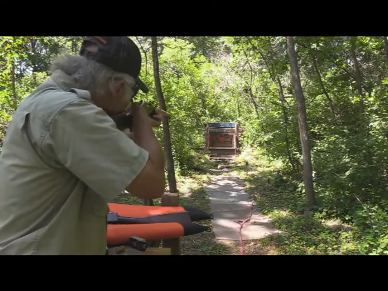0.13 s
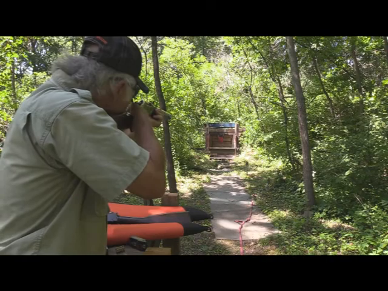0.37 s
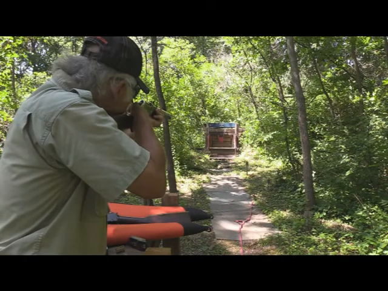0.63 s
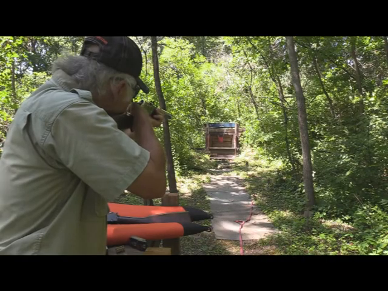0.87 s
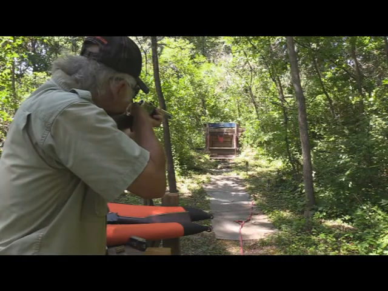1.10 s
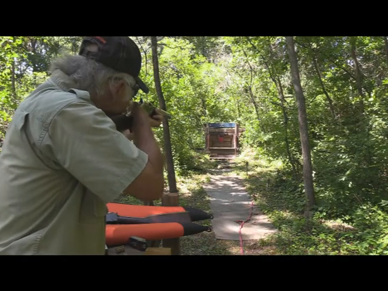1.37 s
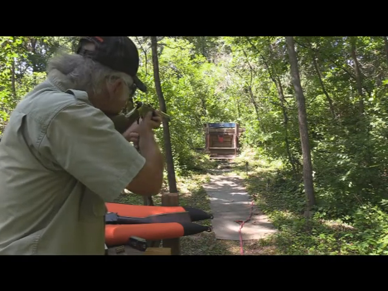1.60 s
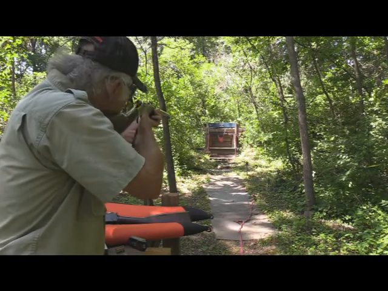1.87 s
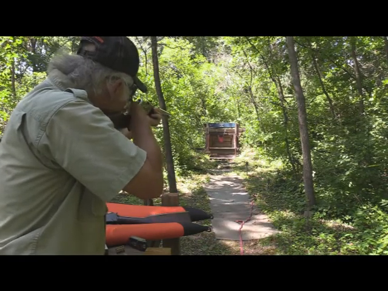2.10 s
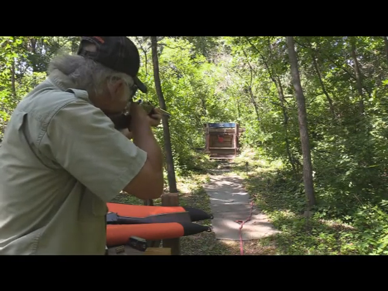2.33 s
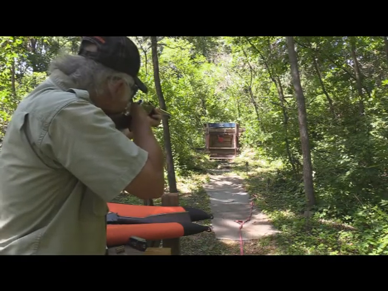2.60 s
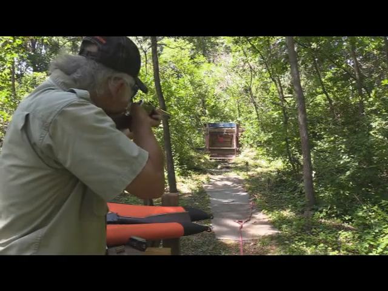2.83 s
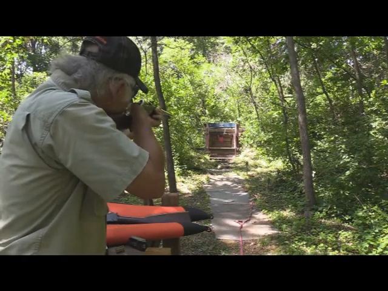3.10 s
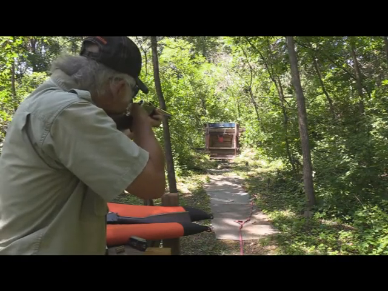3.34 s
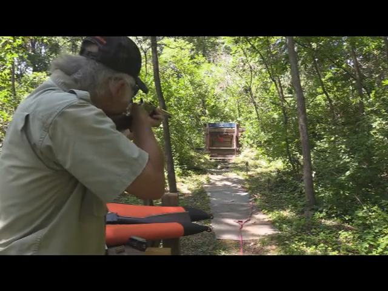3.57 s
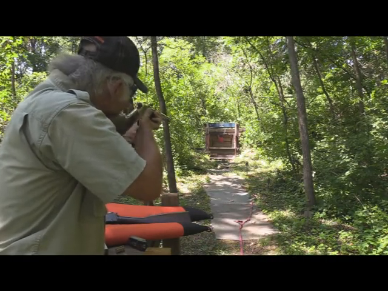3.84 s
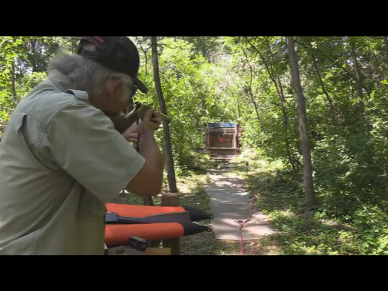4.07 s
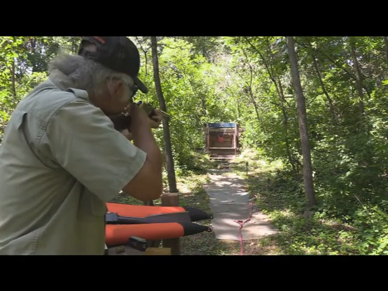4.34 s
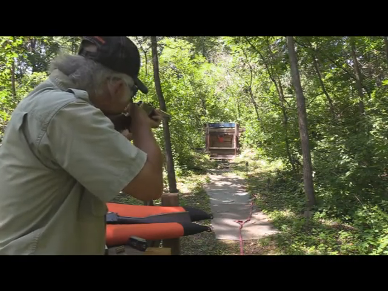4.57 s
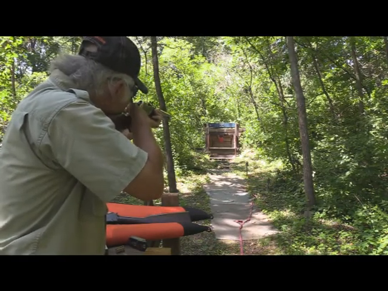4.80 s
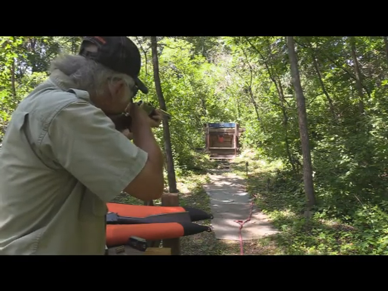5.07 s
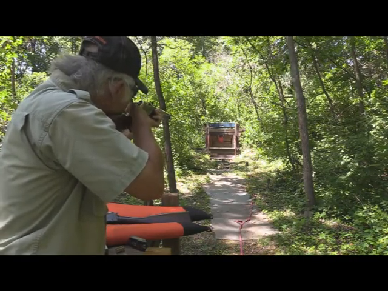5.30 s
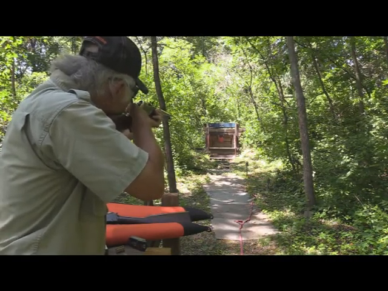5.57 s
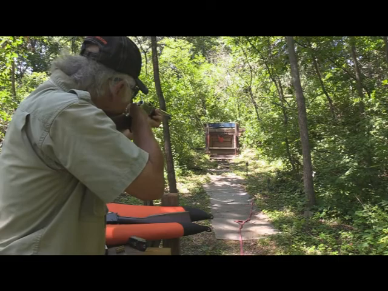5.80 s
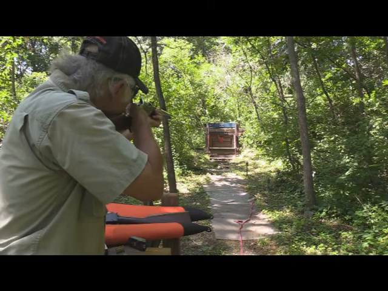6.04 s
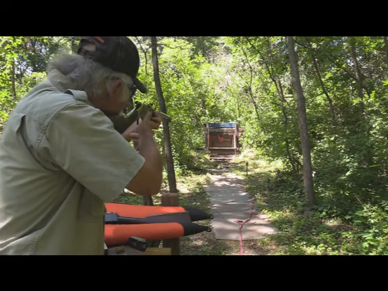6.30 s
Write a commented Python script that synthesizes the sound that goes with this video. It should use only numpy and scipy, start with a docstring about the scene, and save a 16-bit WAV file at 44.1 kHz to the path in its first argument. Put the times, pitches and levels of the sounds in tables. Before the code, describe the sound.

A steady, quiet hiss of leaves and insects fills a wood, with faint low wind rumbling on a microphone near the shooting bench, gusting slightly around 0.7 s. At 1.23 s a small rifle cracks, loud and hard, its onset squashed and clipped, with quick slaps from tree trunks. About 0.07 s later a steel plate farther out smacks and rings high and short, under a hissing echo lasting around half a second or more. From 1.6 to 1.72 s the lever opens with crisp clacks and a tiny brass ring; from 1.9 to 2.07 s the bolt slides and locks home. A second shot comes at 3.52 s, clang at 3.59, opening clicks at 3.9-4.0, closing at 4.15-4.35, and a faint click at 4.5. The third shot is at 5.91 s, its plate ring weaker at 5.99; the lever clacks open at 6.3-6.42 s as everything stops.

```python
"""A wood, one microphone near a shooting bench: leaves and insects hiss, wind rumbles on the microphone.
Three times a small rifle fires: hammer, crack and gas bursts, a pressure push and a slow suction.
Trunks throw single slaps back, a steel plate farther out smacks and rings high, leaves scatter a long hiss.
After each shot the lever is worked close by: clicks of struck modes, and bushes that answer them.
A fast limiter flattens the start of each shot into a plateau, and the blast clips."""
import sys
import numpy as np
from scipy import signal
from scipy.fft import rfft, irfft
from scipy.io import wavfile
from scipy.ndimage import uniform_filter1d

SR = 44100
rng = np.random.default_rng(int(sys.argv[2]) if len(sys.argv) > 2 else 0)


def voltage_ratio(decibels):
    """Convert decibels (scalar or array-like) to amplitude ratios, 20 dB per decade."""
    exponent = np.asarray(decibels, float) / 20
    return 10 ** exponent


def to_wav(s):
    """Save 16-bit WAV."""
    ch = np.atleast_2d(s).T  # columns
    pcm = np.round(np.clip(ch, -1, 1) * 32767)  # PCM
    wavfile.write(sys.argv[1], SR, pcm.astype(np.int16))


N = 283101


def evened(x):
    """Scaled to rms 1."""
    return x / np.sqrt(np.mean(x ** 2) + 1e-20)


def read(f, value, hz):
    """Joins points on a log-frequency axis."""
    return np.interp(np.log(hz + 1), np.log(np.asarray(f) + 1), value)


def add(mix, s, sound):
    """Mixes a sound in at s seconds."""
    part = mix[round(s * SR):][:len(sound)]
    part += sound[:len(part)]


def shaped(magnitude, size):
    """Noise whose short-time spectrum is magnitude (bins x frames)."""
    real, imag = rng.standard_normal(magnitude.shape[::-1] + (2,)).T
    return signal.istft((real + 1j * imag) * magnitude, nperseg=size, noverlap=size * 3 // 4)[1]


def patchy(frames, bins, long, wide):
    """Random patches (bins x frames) of rms 1, smoothed over long frames and wide bins."""
    noise = rng.standard_normal((frames, bins))
    return evened(uniform_filter1d(uniform_filter1d(noise, long, 0), wide, 1)).T


def ring(hz, t60, seconds):
    """One dying mode of random phase."""
    t = np.arange(round(seconds * SR)) / SR
    return voltage_ratio(-60 * t / t60) * np.sin(2 * np.pi * (hz * t + rng.random()))


# spectrum of the air in the wood: (frequency [Hz], relative level [dB per Hz])
AIR_SPECTRUM = [(15, -34.5), (25, -9), (64, -11.5), (92, -9.5), (114, -9), (166, -6.5), (285, -10),
                (354, -7), (384, -7.5), (451, -10.5), (1890, -17.5), (5880, -15), (6920, -23.5),
                (14800, -44), (16000, -45)]


def leaves_and_insects():
    """Steady hiss all round the microphone: shaped noise in slightly uneven patches."""
    air_db = -39.5  # rms
    hz = np.fft.rfftfreq(1024, 1 / SR)[:, None]
    patches = patchy(N // 256 + 5, 513, 12, 14)
    spectrum_db = read(*np.transpose(AIR_SPECTRUM), hz) + .7 * patches
    return voltage_ratio(air_db) * evened(shaped(voltage_ratio(spectrum_db), size=1024)[:N])


# wind on the microphone, before the gusts: (time [s], level [dB])
WIND_LEVEL = [(0, -51), (.7, -41.5), (1, -55.5), (2.5, -52), (3.3, -59), (3.6, -52.5), (4.5, -61),
              (6.42, -61)]


def wind():
    """Lumpy wind on the microphone: low band noise with random gusts in level."""
    gust_db, gusts_per_s = 2, 3.22
    band = signal.butter(2, [18, 45], "band", fs=SR, output="sos")
    rumble = evened(signal.sosfilt(band, rng.standard_normal(N)))
    t = np.arange(N) / SR
    gusts = np.interp(t * gusts_per_s, np.arange(64), rng.standard_normal(64))
    return rumble * voltage_ratio(np.interp(t, *np.transpose(WIND_LEVEL)) + gust_db * gusts)


def scatter(table):
    """Echo of a click among trees: each band builds up, then dies, in patches as clumps of leaves answer."""
    hz, t = np.fft.rfftfreq(256, 1 / SR)[:, None], np.arange(900) * 64 / SR
    f, db, t60, build = np.transpose(table)
    patches = patchy(900, 129, 8, 12)
    grown = np.sqrt(1 - np.exp(-(t / read(f, build, hz)) ** 2))
    level_db = read(f, db, hz) - 60 * t / read(f, t60, hz) + 1.654 * patches
    echo = shaped(voltage_ratio(level_db) * grown, size=256)
    return echo / np.linalg.norm(echo)


# the denser wood behind the plate: (frequency [Hz], relative level [dB], t60 [s], build-up [s])
FAR_WOOD_BANDS = [(193, -27, 1, 0.147), (671, -7.5, 0.933, 0.058), (1610, -2, 0.937, 0.066),
                  (2780, -1.5, 0.875, 0.0358), (5205, -3, 0.568, 0.0113), (9200, -26, 0.38, 0.043)]


def far_wood():
    """The denser wood behind the plate scatters a duller echo."""
    return scatter(FAR_WOOD_BANDS)


# the wood: (frequency [Hz], relative level [dB], t60 [s], build-up [s])
WOOD_BANDS = [(60, -42.5, .5, 0.0078), (151, -6.5, 0.27, 0.08), (311, -15, 1, 0.458),
              (687, -7, 0.37, 0.011), (1580, -8.5, 0.654, 0.0098), (2980, 0, 0.573, 0.0285),
              (3565, -5, 0.585, 0.05), (5800, -3.5, 0.778, 0.026), (6254, -5, 0.788, 0.0044),
              (8730, -15, 0.747, 0.0079), (12520, -17.5, 0.557, 0.0081), (16000, -32, .5, .004)]


def wood():
    """Leaves of the wood scatter a long hiss."""
    return scatter(WOOD_BANDS)


# bushes near the bench: (frequency [Hz], relative level [dB], t60 [s], build-up [s])
BUSH_BANDS = [(500, -20, 0.31, 0.033), (1990, 0.1, 0.4, 0.025), (4590, 6, 0.28, 0.0185),
              (6950, 3.5, 0.308, 0.0098), (11100, -4, 0.308, 0.0049), (15500, -5.5, .25, .01)]


def near_bushes():
    """The near bushes scatter the blows of the lever."""
    return scatter(BUSH_BANDS)


# modes of the steel plate: (frequency [Hz])
PLATE_MODE_HZ = (3781, 4708, 5600, 6425, 7631, 7766, 9114, 9550, 10640, 11590, 11715, 12570, 13265)
# decay of each mode, and its relative level in hits on three different spots:
# (t60 [s], first hit [dB], second hit [dB], third hit [dB])
PLATE_MODES = [(0.43, -28.5, -28.5, -24), (0.37, -3, -1, -13), (0.41, -19.5, -23, -15.5),
               (0.36, -11, -19, -16), (0.46, -12, -13, -14), (0.2886, -8.5, -15, 3), (0.434, -20, -23, -12),
               (0.51, -30, -31, -24), (0.516, -31, -35, -28), (0.32, -26, -32.5, -16.5),
               (0.26, -28, -29, -23), (0.346, -20, -18, -30.5), (.35, -18, -22, -20)]


def plate(hit):
    """The bullet's smack, then the modes; each wavers in strength and phase as its sound arrives by many paths."""
    ring_db, waver, wavers_per_s = 4.5, .8, 90
    t = np.arange(SR) / SR
    smack = signal.lfilter([1, -1], [1, -1.6, .63], rng.standard_normal(SR))
    out = voltage_ratio(7 - 60 * t / .007) * smack
    out += voltage_ratio(10) * ring(2000, .007, 1)
    swell = np.sqrt(1 - .75 * np.exp(-t / .03))  # reflections from the backstop add up
    for hz, (t60, *db) in zip(PLATE_MODE_HZ, PLATE_MODES):
        draws = rng.standard_normal((80, 2)).T
        a, b = (np.interp(t, np.arange(80) / wavers_per_s, waver * v) for v in draws)
        mode = ((1 + a + 1j * b) * np.exp(2j * np.pi * hz * t)).imag
        out += voltage_ratio(db[hit] + ring_db - 60 * t / t60) * swell * mode
    return out


# the plate as it reaches the microphone: (time [s], level [dB])
HITS = [(1.3040, 3), (3.5893, 1), (5.9885, -1.5)]


def plate_hits():
    """Three hits on the plate, each echoed by the wood."""
    wood_db = -12
    out = np.zeros(N)
    for hit, (s, db) in enumerate(HITS):
        add(out, s, voltage_ratio(db) * plate(hit))
    return out + voltage_ratio(wood_db) * signal.fftconvolve(out, wood())[:N]


# modes of the rifle's action, before each contact alters them: (frequency [Hz], relative level [dB], t60 [s])
ACTION_MODES = [(760, -5, .04), (980, -5, .04), (1250, -9, .03), (1540, -8, .035), (1830, -3, .04),
                (2100, -7, .03), (2600, -5, .02), (3750, -8, .018), (5200, -12, .014), (7300, -12, .014),
                (9300, -12, .012), (11450, -13, .014), (13500, -13, .01)]
# contacts of the action, levels against 2.2 kHz:
# (900 Hz level [dB], 5 kHz level [dB], 10.5 kHz level [dB], ring length [factor], rise [s])
CONTACT_SOUNDS = {"latch": (1.5, 11.5, 5, 0.8, .0007), "unlock": (-11.5, 3.5, -6, 0.55, .0006),
                  "eject": (-15, -9.5, -6.5, 0.7777, .0009), "rebound": (1.9, 14.1, 8.5, 0.92, .0007),
                  "cock": (-13, 1.5, -6.5, 0.5044, .0006), "chatter": (-15, 6.5, -3, 0.45, .0007),
                  "stop": (1.5, -2.5, -5, 0.7344, .0007), "lifter": (5, 8, 4, 0.543, .0007),
                  "feed": (-7.5, -3, -20.5, .5, .0015), "nudge": (9, 0.5, -13.5, 0.42, .0008),
                  "slide": (-14, -10, -13, .55, .0011), "lock": (-9, 0, 7, .65, .0006),
                  "seat": (-6, 0, -9, .7, .0009), "trigger": (-5, 21, 4, 0.87, .0006)}


def click(db, contact):
    """A short crack and the action's modes, coloured by which parts meet; also returns the bare blow."""
    size, under_db = 4096, -17  # 150 Hz lies this far under 900 Hz
    t, hz = np.arange(size) / SR, np.fft.rfftfreq(size, 1 / SR)
    thud_db, snap_db, tick_db, length, rise = CONTACT_SOUNDS[contact]
    modes = np.zeros(size)
    for f, mode_db, t60 in ACTION_MODES:
        level = voltage_ratio(mode_db + 3 * rng.standard_normal())
        modes += level * ring(f * rng.uniform(.95, 1.05), t60 * length, size / SR)
    crack = voltage_ratio(4 - 60 * t / (.012 * length)) * rng.standard_normal(size)
    loose_parts = uniform_filter1d(rng.standard_normal(size), size=5)  # duller
    rattle = voltage_ratio(5.5 - 60 * t / (0.04154 * length)) * loose_parts
    points_db = [thud_db + under_db, thud_db, 0, snap_db, tick_db]
    colour_db = db + read([150, 900, 2200, 5000, 10500], points_db, hz)
    colour_db += read([12500, 16500], [0, -14], hz)
    cepstrum = irfft(np.log(voltage_ratio(colour_db)))
    cepstrum[1:size // 2] *= 2  # folded onto positive time: a causal filter
    cepstrum[size // 2 + 1:] = 0
    colour = np.exp(rfft(cepstrum))
    struck = (modes + crack + rattle) * (1 - np.exp(-(t / rise) ** 2))
    return irfft(rfft(struck) * colour), irfft(colour)


# the bolt slides home: (time of the hardest rub [s], length after it [s], level [dB])
BOLT_SLIDES = [(1.973, 0.087, -32), (4.242, 0.0925, -32)]


def bolt_rubs():
    """Sliding metal: random grit impulses excite the lower modes of the action."""
    rise_s, rise_db, fade_db = .018, -14, -12.5
    out = np.zeros(N)
    body = sum(voltage_ratio(db) * ring(f, t60 / 2, .05) for f, db, t60 in ACTION_MODES[:8])
    for s, length, db in BOLT_SLIDES:
        t = np.arange(-rise_s, length, 1 / SR)
        grit = voltage_ratio(1.66 * rng.exponential(1, len(t))) * (rng.random(len(t)) < 1500 / SR)
        rub = evened(signal.oaconvolve(grit, body)[:len(t)])
        level_db = db + np.interp(t, [t[0], 0, length], [rise_db, 0, fade_db])
        add(out, s + t[0], voltage_ratio(level_db) * rub)
    return out


# spent brass: (time [s], level [dB], t60 [s])
BRASS_RINGS = [(1.683, -29, .1), (1.701, -38, .08), (3.975, -38.5, .06), (6.294, -27.5, 0.031),
               (6.374, -29, 0.093)]


def ejected_cases():
    """The spent brass rings in one high mode."""
    out = np.zeros(N)
    for s, db, t60 in BRASS_RINGS:
        add(out, s, voltage_ratio(db) * ring(12650, t60, .2))
    return out


# the lever worked after each shot: (time [s], level [dB], contact [name])
LEVER_CLICKS = [(1.5855, -17.5, "latch"), (1.596, -19.5, "chatter"), (1.6158, -3, "unlock"),
                (1.6758, 0, "eject"), (1.6796, -18.5, "rebound"), (1.6932, -2.5, "cock"),
                (1.6996, -20.5, "chatter"), (1.715, -8.5, "stop"), (1.7215, -14.5, "stop"),
                (1.8867, -26.5, "lifter"), (1.945, -14, "feed"), (1.9789, -27, "nudge"),
                (1.983, -22.5, "feed"), (1.9995, -3, "feed"), (2.0221, -44, "rebound"),
                (2.0319, -13, "slide"), (2.051, -19.5, "slide"), (2.0645, -8, "cock"), (2.0681, -3, "lock"),
                (2.0727, -7.5, "seat"), (2.2154, -36.5, "trigger"), (3.876, -21, "latch"),
                (3.9107, -4, "unlock"), (3.9154, -14, "chatter"), (3.9672, 1.5, "eject"),
                (3.9725, -20, "rebound"), (3.9835, -1.5, "cock"), (3.9887, -21, "chatter"),
                (4.0043, -7, "stop"), (4.0119, -28, "stop"), (4.1571, -25.5, "lifter"),
                (4.215, -12, "feed"), (4.2453, -24, "nudge"), (4.2544, -31.5, "nudge"),
                (4.2668, -3, "feed"), (4.2985, -11, "slide"), (4.3215, -20.5, "slide"),
                (4.336, -10, "slide"), (4.3415, -7, "lock"), (4.3471, -12, "seat"), (4.501, -32, "trigger"),
                (4.5037, -18, "slide"), (6.2933, -17.5, "latch"), (6.3008, -14.5, "stop"),
                (6.3149, -3.5, "unlock"), (6.3663, 2, "eject"), (6.3719, -1.5, "eject"),
                (6.4124, -12, "stop"), (6.4184, -27, "stop")]


def lever():
    """Clicks, the rub of the bolt and the ring of the brass; the bushes throw each blow back."""
    bush_db = 5.5
    out, blows = np.zeros((2, N))
    for s, db, contact in LEVER_CLICKS:
        sound, blow = click(db, contact)
        add(out, s - .0008, sound)
        add(blows, s, blow)
    echo = voltage_ratio(bush_db) * signal.fftconvolve(blows, near_bushes())[:N]
    return out + bolt_rubs() + ejected_cases() + echo


def slap(hz, cycles, t):
    """The blast thrown back by one trunk: a cycle or two."""
    return np.exp(-(2 * hz * t / cycles) ** 2) * np.sin(2 * np.pi * hz * t + 1.0)


# many small slaps: (rate [per s], level [dB], t60 [s], lowest frequency [Hz], highest frequency [Hz])
SMALL_SLAPS = (500, 1, .6, 1600, 3600)


def small_slaps():
    """Half a second of random slaps, a few strong and most weak: thick trunks answer low, thin ones high."""
    rate, db, t60, low_hz, high_hz = SMALL_SLAPS
    out, t = np.zeros(SR // 2), np.arange(SR // 2) / SR
    for hz in np.geomspace(low_hz, high_hz, 5):
        draw, size = rng.random((SR // 2, 2)).T
        level = voltage_ratio(db - 60 * t / t60 - 3.53 * np.log(size + 0.00091))
        train = (draw < rate / 5 / SR) * level
        out += signal.oaconvolve(train, slap(hz, 1.31, t[:200] - t[100]))[:SR // 2]
    return out


# slow suction after the pressure push: (level [dB], time constant [s])
SUCTION = (7.2, 0.0187)


def pressure_push(t):
    """Overpressure that falls through zero, then a slow suction."""
    push_s, push_db = .002, 20
    suck_db, suck_s = SUCTION
    push = voltage_ratio(push_db) * (1 - t / push_s) * np.exp(-t / push_s)
    return push - voltage_ratio(suck_db) * t / suck_s * np.exp(-t / suck_s)


# hammer, crack, muzzle gas, bench: (time after the shot [s], rise [s], t60 [s])
BURST_TIMES = [(-.0105, .0004, .025), (-.0006, .0009, .006), (.0031, .0012, .011), (.0086, .0004, .008)]
# the same four, before rise and decay: (level [dB], centre [Hz], width [Hz])
BURST_BANDS = [(-18, 1170, 2600), (18.5, 4280, 8400), (22.5, 3000, 11300), (14.5, 3740, 7000)]
# arrival of each slap from trunks and the backstop: (time after the shot [s])
SLAP_TIMES = (.0193, .0224, .0242, .0262, .0507, .0586, .0628, .0693, .0711, .0665, .0235)
# the same slaps, before a random change of level: (level [dB], frequency [Hz], length [cycles])
SLAP_SOUNDS = [(11, 2400, 1.2), (13, 2200, 1.1), (14, 2800, 1.8), (10, 2600, 1.2), (11, 2300, 1.1),
               (12, 1600, 1.1), (20, 3000, 2.2), (17, 2700, 1.4), (16, 2300, 1.3), (-10, 170, 1.1),
               (3, 500, 2.6)]


def muzzle():
    """Hammer, crack, gas, bench and pressure push, then the slaps; the shot falls 50 ms into the array."""
    shot_s = 1 / 20
    out, t = np.zeros(SR), np.arange(SR // 20) / SR
    for (s, rise, t60), (db, hz, width) in zip(BURST_TIMES, BURST_BANDS):
        r = np.exp(-np.pi * width / SR)
        resonance = [1, -2 * r * np.cos(2 * np.pi * hz / SR), r * r]
        noise = evened(signal.lfilter([1], resonance, rng.standard_normal(len(t))))
        add(out, shot_s + s, voltage_ratio(db - 60 * t / t60) * (1 - np.exp(-(t / rise) ** 2)) * noise)
    add(out, shot_s + .0037, pressure_push(t))
    middle = t[-1] / 2
    for s, (db, hz, cycles) in zip(SLAP_TIMES, SLAP_SOUNDS):
        level = voltage_ratio(db + rng.standard_normal())
        add(out, shot_s + s - middle, level * slap(hz, cycles, t - middle))
    add(out, shot_s + .012, small_slaps())
    return out


# the rifle on the bench: (time [s], muzzle level [dB])
RIFLE_SHOTS = [(1.232, -2.5), (3.5169, -3), (5.9145, -3.5)]


def shots():
    """Each muzzle blast with its hiss from the wood and a later one from the far wood."""
    wood_db, far_db, far_s = 4.5, -5, .11
    out, echo_gain = np.zeros(N), np.sqrt(SR / 10)
    for s, db in RIFLE_SHOTS:
        add(out, s - 1 / 20, voltage_ratio(db) * muzzle())
        add(out, s, voltage_ratio(db + wood_db) * echo_gain * wood())
        add(out, s + far_s, voltage_ratio(db + far_db) * echo_gain * far_wood())
    return out


def scene():
    """Air and wind, plate, lever and shots with their echoes, as one channel."""
    return (leaves_and_insects() + wind() + plate_hits() + lever() + shots())[None]


def roll_off(x):
    """The treble ends steeply here."""
    return signal.sosfilt(signal.butter(12, 16450, fs=SR, output="sos"), x)


def record(dry):
    """Bass cut, a limiter that grips in a few ms and lets go fast, hard clipping, treble edge."""
    x = signal.sosfilt(signal.butter(1, 22, "high", fs=SR, output="sos"), dry)
    peak_db = 20 * np.log10(abs(x[0]) + 1e-9)
    fall = np.arange(N) * 1583.0 / SR  # release: 1583 dB a second
    held_db = np.maximum.accumulate(peak_db + fall) - fall
    over_db = np.maximum(held_db + 4.5, 0)  # threshold -4.5 dB
    grip = np.exp(-1 / (0.00478 * SR))  # attack time constant in s
    x = x / voltage_ratio(1.06 * signal.lfilter([1 - grip], [1, -grip], over_db))
    clipped = np.clip(x, -.97, .97)
    finished = signal.sosfilt(signal.butter(8, 16000, fs=SR, output="sos"), clipped)
    return roll_off(finished)


dry = scene()
out = record(dry)
to_wav(out)
```